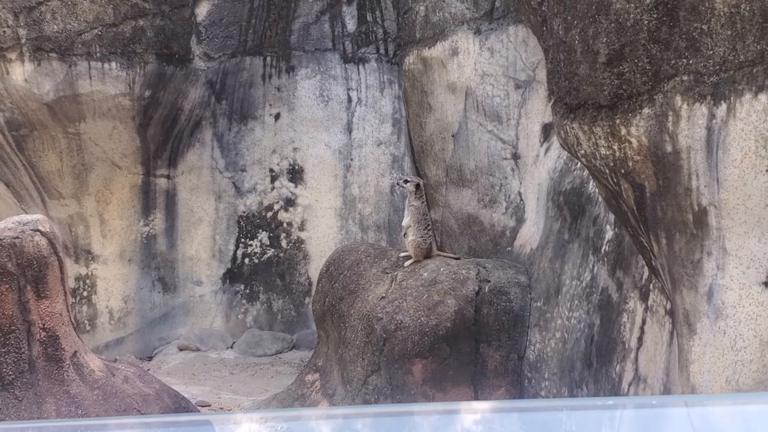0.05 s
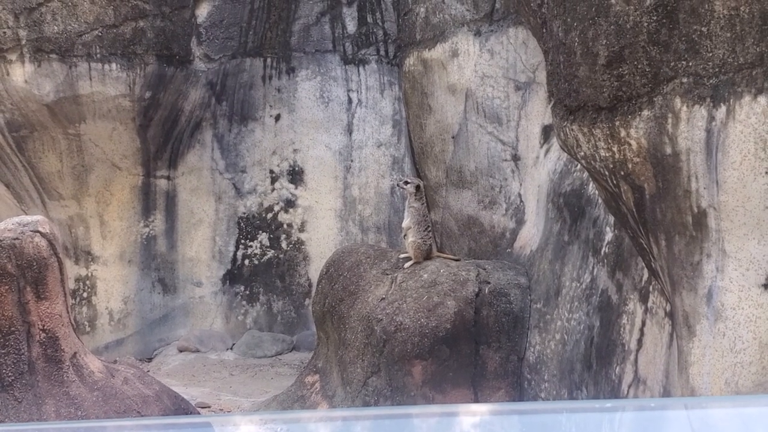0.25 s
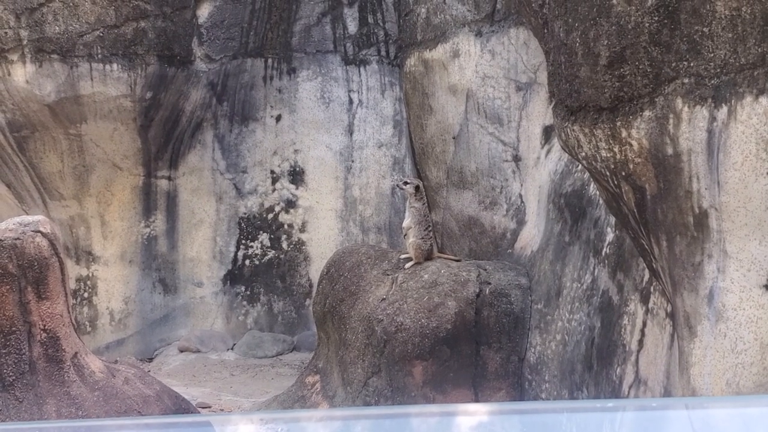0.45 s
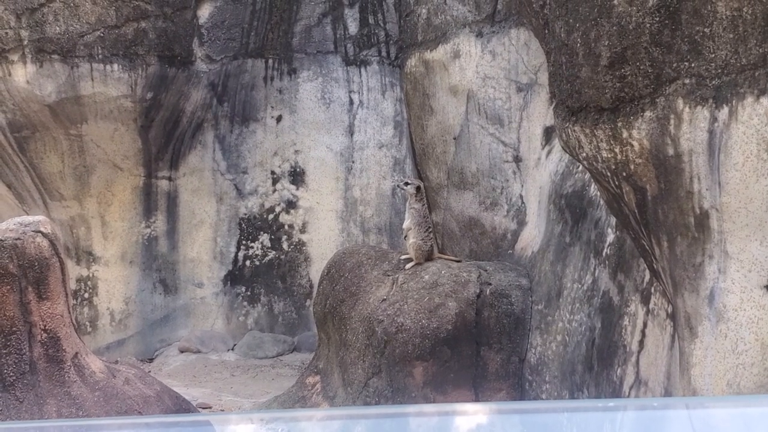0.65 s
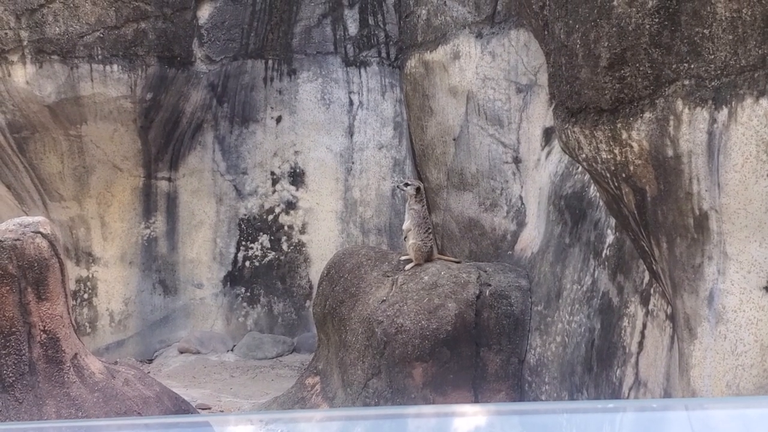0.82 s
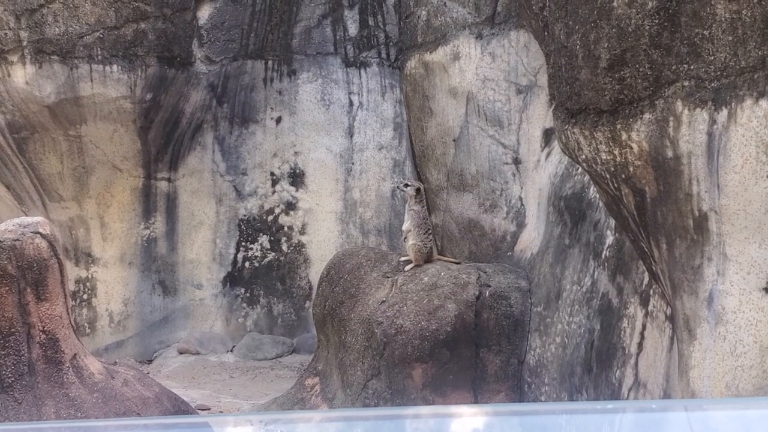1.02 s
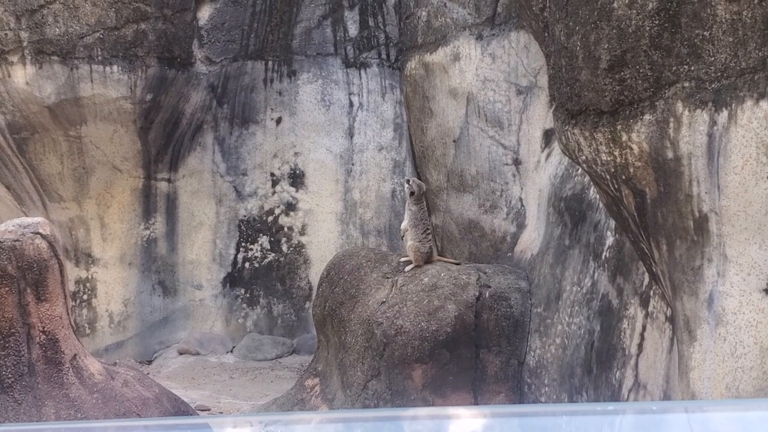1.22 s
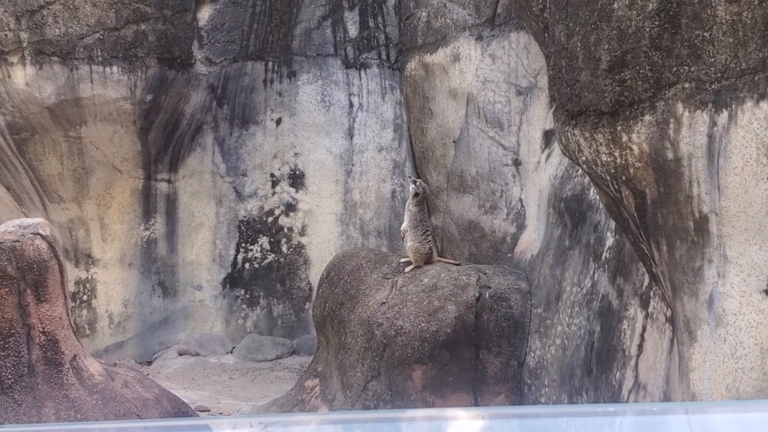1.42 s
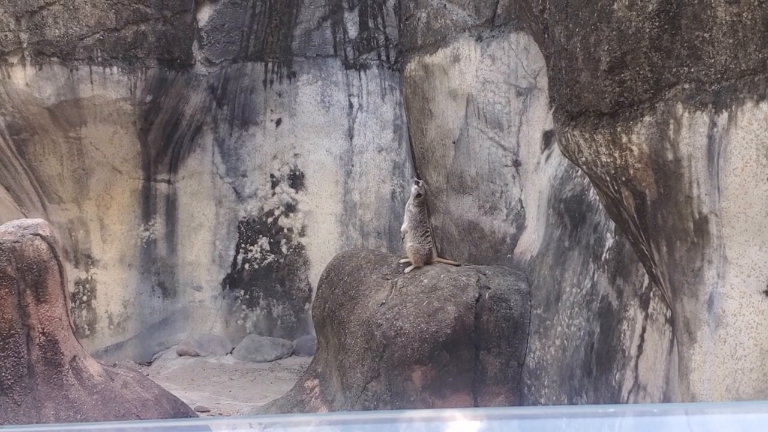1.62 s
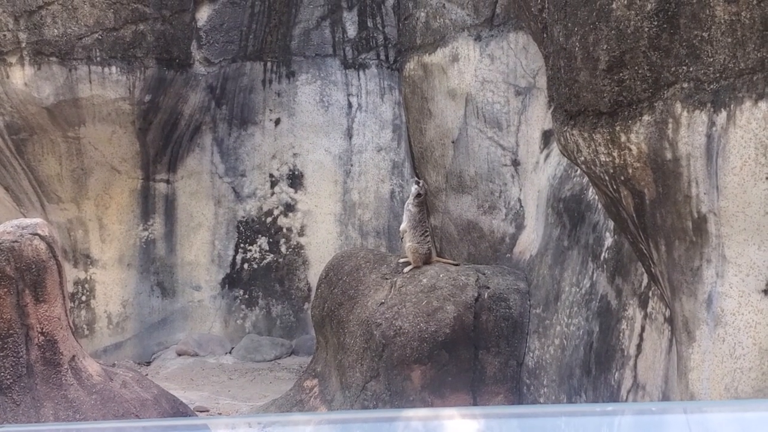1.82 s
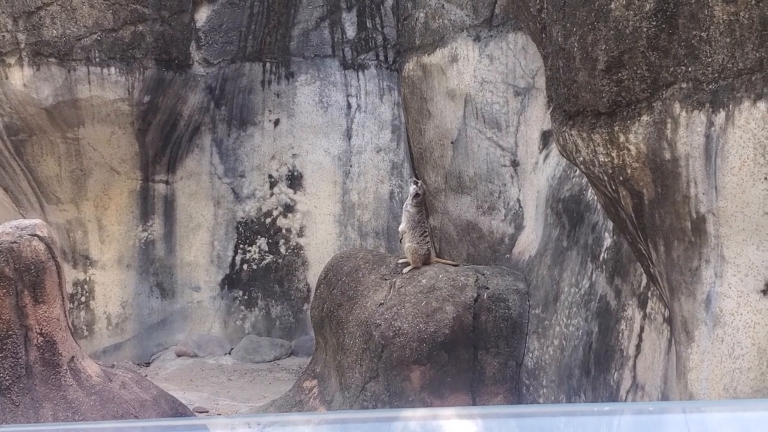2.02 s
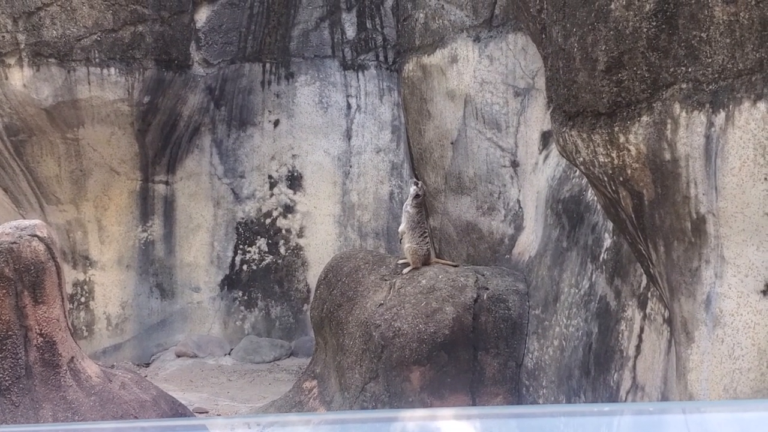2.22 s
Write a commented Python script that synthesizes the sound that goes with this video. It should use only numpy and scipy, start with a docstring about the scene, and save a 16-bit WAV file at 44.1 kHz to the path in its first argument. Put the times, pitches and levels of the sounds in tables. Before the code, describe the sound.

Three brief, raspy barks from a meerkat come evenly spaced, with a slight echo off nearby rock. Outdoor hiss runs throughout, while gusts rumble and flutter on the microphone, peaking after the first bark and easing after the second.

```python
"""A steady outdoor hiss is heard first, and soon gusts of wind buffet the two microphone ports (openings).
A meerkat on a rock gives three hoarse alarm barks; the rock walls of its enclosure throw them back.
Each bark is a rasp of air and fluttering vocal folds through a throat whose resonances (the pitches
at which it rings) rise as the mouth opens. The wind is strongest between the first two barks."""
import sys
import numpy as np
from scipy import signal
from scipy.fft import rfft, irfft
from scipy.io import wavfile
from scipy.ndimage import uniform_filter1d

SR = 44100
rng = np.random.default_rng(int(sys.argv[2]) if len(sys.argv) > 2 else 0)


def wrap_up_sound(samples):
    """Save the sound to the file named by the first command line argument, as 16-bit audio."""
    columns = np.atleast_2d(samples).T
    # keep every value between -1 and 1, then stretch to whole-number steps
    tamed = np.clip(columns, -1, 1)
    steps = np.round(tamed * 32767).astype(np.int16)
    wavfile.write(sys.argv[1], SR, steps)


N = 103635


def amp(db):
    """Turns decibels into a number to multiply by."""
    return 10 ** (np.asarray(db) / 20)


def unit(x):
    """Scales a signal to an average strength (rms) of 1."""
    return x / np.sqrt(np.mean(x ** 2) + 1e-20)


def read(points, hz):
    """Looks up values between a table's rows, on a log-frequency scale."""
    f, value = np.transpose(points)
    return np.interp(np.log(hz + 1), np.log(f + 1), value)


def add(mix, start_s, sound):
    """Mixes a sound in at a given time."""
    part = mix[round(start_s * SR):][:len(sound)]
    part += sound[:len(part)]


def colour(x, points):
    """Turns frequencies up or down by a table of f/Hz, gain/dB."""
    hz = np.fft.rfftfreq(x.shape[-1], 1 / SR)
    return irfft(rfft(x) * amp(read(points, hz)), x.shape[-1])


def wander(size, hz):
    """A random wobble, mostly slower than hz."""
    f = np.fft.rfftfreq(SR, 1 / SR)
    return unit(irfft(rfft(rng.standard_normal(SR)) / (1 + (f / hz) ** 4), SR))[:size]


def resonate(x, hz, width):
    """Makes x ring in a band around hz, which may glide."""
    turn = np.exp(2j * np.pi * np.cumsum(hz * np.ones(len(x))) / SR)
    decay = np.exp(-np.pi * width / SR)
    return (turn * signal.lfilter([(1 - decay) ** 2], [1, -2 * decay, decay ** 2], x / turn)).real


def hiss():
    """A distant outdoor wash of noise, slightly patchy, that slowly swells and sinks."""
    tone = [(20, -13.5), (60, 5), (160, -6), (230, -10.5), (500, -10), (700, -12.5), (1100, -16.5),
            (1650, -16.5), (2400, -18), (3500, -20), (4500, -17.5), (5400, -24), (6600, -24), (7800, -35),
            (8700, -34), (9700, -37), (11300, -34), (12500, -34), (14300, -40.5), (15500, -45)]  # tone of the hiss: f/Hz, relative level/dB
    likeness = [(60, 0.81), (150, 0.947), (380, 0.94), (950, 0.092), (2380, -0.075), (5980, 0.059),
                (15000, 0.014)]  # how alike the two sides are: f/Hz, likeness (1 = the same)
    balance = [(60, -3.5), (130, -1), (290, 0.0), (640, -1), (1410, -4.5), (3100, -5), (6820, -2),
               (15000, 5)]  # which side is louder: f/Hz, left minus right/dB
    swell = [(0, -57), (.45, -55.5), (.9, -53.5), (1.3, -55.5), (1.75, -56), (2.0, -53), (2.35, -57)]  # slow rise and fall: t/s, relative level/dB
    gain_db, patchy_db = 12.5, 1.0
    frames, hz = N // 256 + 5, np.fft.rfftfreq(1024, 1 / SR)
    a, b, c, d, patches = rng.standard_normal((5, frames, len(hz)))
    patches = uniform_filter1d(patches, size=12, axis=0)  # smooth over time
    patches = unit(uniform_filter1d(patches, size=12, axis=1))  # and over frequency
    same = np.clip(read(likeness, hz), -1, 1)
    left = a + 1j * b
    right = same * left + np.sqrt(1 - same ** 2) * (c + 1j * d)
    lean = amp(read(balance, hz) / 2)
    spectra = np.array([left * lean, right / lean]) * amp(read(tone, hz) + patchy_db * patches)
    wash = unit(signal.istft(spectra.transpose(0, 2, 1), nperseg=1024, noverlap=768)[1][:, :N])
    return wash * amp(gain_db + np.interp(np.arange(N) / SR, *np.transpose(swell)))


def wind():
    """Swirling air rumbles at each port on its own; strong gusts add a faster flutter."""
    gusts = [(0.144, 0.032, -34.5, -36.5), (0.202, 0.0124, -31.5, -42.5), (0.226, 0.0145, -38, -28),
             (0.284, 0.0227, -27, -52.5), (0.506, 0.0134, -31.5, -26.5), (0.555, 0.0102, -26, -29),
             (0.612, 0.0202, -24.5, -25), (0.624, 0.0235, -31.5, -26), (0.768, 0.048, -33, -34),
             (0.848, 0.027, -28.5, -16), (0.883, 0.0146, -23, -20), (0.924, 0.0225, -24.5, -19),
             (1.012, 0.0303, -42, -24), (1.188, 0.0173, -31, -38.5), (1.361, 0.0177, -49.5, -29.5),
             (1.418, 0.0073, -31.5, -26), (2.082, 0.02966, -51.5, -29.5)]  # gusts: centre t/s, half length/s, left level/dB, right level/dB
    rumble_tone = [(12, -25.5), (28, -27.5), (45, -1), (65, 6.5), (100, -3), (160, -23), (300, -32),
                   (700, -83.5), (2000, -100)]  # deep rumble: f/Hz, relative level/dB
    flutter_tone = [(40, -35), (110, 18.5), (190, 1.5), (320, -11.5), (500, -14), (800, -24.5), (2000, -52)]  # higher flutter: f/Hz, relative level/dB
    breeze_db, strong_db = -42, -20.5
    flutter_db, flutter_growth = -10, 1.572
    t, sides = np.arange(N) / SR, []
    for side in range(2):
        gust_power = sum(amp(db[side]) ** 2 * np.exp(-((t - at) / half) ** 2) for at, half, *db in gusts)
        force = np.sqrt(amp(breeze_db) ** 2 + gust_power) / amp(strong_db)  # 1 in a strong gust
        rumble = unit(colour(rng.standard_normal(N), rumble_tone))
        rumble /= np.sqrt(uniform_filter1d(rumble ** 2, size=1500) + 0.055)  # even out chance swells
        flutter = amp(flutter_db) * unit(colour(rng.standard_normal(N), flutter_tone))
        sides.append(amp(strong_db) * (force * rumble + force ** flutter_growth * flutter))
    return np.array(sides)


def eddies():
    """Each sharp eddy (a small swirl of air) is one quick suck and push of pressure at a port."""
    swirls = [(0.319, 0.00144, -22, -43), (.812, 0.001107, -47.5, -15), (.826, 0.001172, -44, -11.5),
              (.842, 0.000785, -45, -11.5), (.876, 0.001157, -36.5, -11.5), (0.923, 0.000897, -45, -14.5),
              (.941, 0.00141, -51, -20), (.966, 0.001135, -50.5, -21.5), (1.01, 0.00129, -48.5, -25)]  # single eddies: t/s, width/s, left peak/dB, right peak/dB
    pressure, t = np.zeros((2, N)), np.arange(N) / SR
    for at, width, *db in swirls:
        offset = (t - at) / width
        pressure += amp(db)[:, None] * offset * np.exp((1 - offset ** 2) / 2)
    return pressure


def bark(length, level_db, size_factor, treble_db):
    """Ragged vocal-fold pulses and puffs of air ring the opening throat; the highs swell in last."""
    # throat resonances, mouth open: f/Hz (times size_factor), width/Hz, level/dB, change at onset/dB
    throat_bands = [(987.5, 232, -18.5, -5.5), (1370.5, 158.4, -4.5, -17), (1494.6, 147.5, -2.5, -32.5),
                    (1613.1, 195, -6.5, -33.5), (1781.7, 129, -12, -33), (2433, 320, -13, -24),
                    (2694.5, 318.3, -7.5, -33), (3210, 1520, -27.5, -30.5)]
    rasp_bands = [(7530, 1280, -27.5), (8770, 1860, -27), (11036, 960, -27.5), (12910, 1140, -34.5)]  # thin upper resonances: f/Hz, width/Hz, relative level/dB
    attack_s, release_s, end_db, rasp_onset_db = 0.0581, 0.03997, -12, -35.5
    open_s, shut_drop_hz = .058, 680  # the throat rings this much lower with the mouth shut
    base_pitch_hz, fold_jitter, air_share = 487.85, .12, 0.7956
    rattle_hz, rattle_db = 281, 5  # uneven flutter of the vocal folds
    voice_db, voice_jitter = -20.5, 0.0735  # a weak plain tone at the folds' pitch
    t = np.arange(0, length, 1 / SR)
    n = len(t)
    slack = np.clip(1 - t / attack_s, 0, 1) ** 1.445  # 1 at the onset, 0 at full effort
    fall = np.clip(1 - (length - t) / release_s, 0, 1)
    loudness = np.clip(np.minimum(t / .016, (length - t) / .006), 0, 1) * amp(end_db * fall)
    mouth = np.sin(np.pi / 2 * np.minimum(t / open_s, 1))  # 0 shut, 1 open
    pitch, wobble = base_pitch_hz * size_factor, wander(n, hz=190.2)
    cycles = np.cumsum(pitch * (1 + fold_jitter * wobble)) / SR
    folds = sum(np.cos(2 * np.pi * k * cycles) for k in range(1, 30))
    puffs = (0.251 + np.exp(-(cycles % 1) / 0.33)) * rng.standard_normal(SR)[:n]  # one puff a cycle
    rattle = amp(rattle_db * np.tanh(wander(n, hz=rattle_hz)))
    breath = ((1 - air_share) * unit(folds) + air_share * unit(puffs)) * rattle
    throat = np.zeros(n)
    for hz, width, db, onset_db in throat_bands:
        rising_hz = size_factor * hz - shut_drop_hz * (1 - mouth)
        throat += amp(db + onset_db * slack) * unit(resonate(breath, rising_hz, width))
    rasp = sum(amp(db) * unit(resonate(breath, hz, width)) for hz, width, db in rasp_bands)
    rasp *= amp(treble_db + rasp_onset_db * slack)
    voice_cycles = np.cumsum(pitch * (1 + voice_jitter * wobble)) / SR
    voice = amp(voice_db - 10.3 * mouth) * unit(np.sin(2 * np.pi * voice_cycles))
    return amp(level_db) * (loudness * (throat + rasp) + np.sqrt(loudness) * voice)


def enclosure(x):
    """The direct sound, a few slaps off the rock, and a short tail of many blurred echoes."""
    echoes = [(.0043, -10, -19), (.0097, -13.5, -3.5), (0.0179, -9.5, -22.5), (0.027, -30, -15.5),
              (.038, -14, -12), (0.183, -29.5, -32.5)]  # echoes off rock faces: delay/s, left level/dB, right level/dB
    fade_times = [(300, 0.176), (1500, 0.293), (2800, 0.369), (7000, 0.375), (14000, 0.152)]  # how long the tail lasts: f/Hz, time to fade by 60 dB/s
    wall_tone = [(400, -0.5), (950, 1), (1280, -2), (1520, 2), (1750, -1), (2150, -3), (2750, -1.5),
                 (5000, 3), (12000, 0)]  # tone of the tail: f/Hz, gain/dB
    tail_db, tail_delay_s = -7, .008
    near = np.array([x, x])
    for delay, *levels in echoes:
        for side, db in enumerate(levels):
            add(near[side], delay + rng.uniform(0, 0.000443), amp(db) * x)
    bounces = rng.standard_normal((2, SR)) * (rng.random((2, SR)) < .07)
    bounces *= np.arange(SR) > tail_delay_s * SR
    hz, t, spectra = signal.stft(bounces, SR, nperseg=256)
    fade = amp(-60 * t / read(fade_times, hz)[:, None])
    tail = signal.istft(spectra * fade, SR, nperseg=256)[1]
    tail /= np.linalg.norm(tail[0])
    return near + amp(tail_db) * signal.fftconvolve(colour(x, wall_tone)[None], tail, axes=1)[:, :N]


def ports(x):
    """The two microphone ports hear the animal with different level and phase (wave timing)."""
    balance = [(480, 3.5), (900, -2), (1500, -6), (2050, -5.5), (2550, 1.5), (3200, 2), (4000, -2.5),
               (7500, 6), (12000, 1)]  # which side is louder: f/Hz, left minus right/dB
    phase_lead = [(100, -0.5), (1270, 1.5), (1500, 1.5), (1900, 1.5), (2900, 2.4), (6000, 1.0),
                  (14000, 1.57)]  # how far the left wave is ahead: f/Hz, phase/rad
    hz = np.fft.rfftfreq(N, 1 / SR)
    lean = amp(read(balance, hz) / 2) * np.exp(1j * read(phase_lead, hz) / 2)
    return irfft(rfft(x) * np.array([lean, 1 / lean]), N)


def scene():
    """Three barks echo in the enclosure, amid hiss and wind."""
    # alarm barks: start t/s, length/s, gain/dB, throat size factor (above 1 = higher), treble/dB
    barks = [(.369, 0.0923, -19, .97, -1), (1.118, 0.10405, -21, 1.025, -0.5),
             (1.841, 0.09425, -20, 1.02, -3.5)]
    meerkat = np.zeros(N)
    for start, *call in barks:
        add(meerkat, start, bark(*call))
    return ports(enclosure(meerkat)) + hiss() + wind() + eddies()


def record(dry):
    """The recorder cuts off the very highest treble."""
    cutoff_hz = 15720
    low_pass = signal.firwin(511, cutoff_hz, window=("kaiser", 9), fs=SR)
    return signal.oaconvolve(dry, low_pass[None], "same")


dry = scene()
out = record(dry)
wrap_up_sound(out)
```